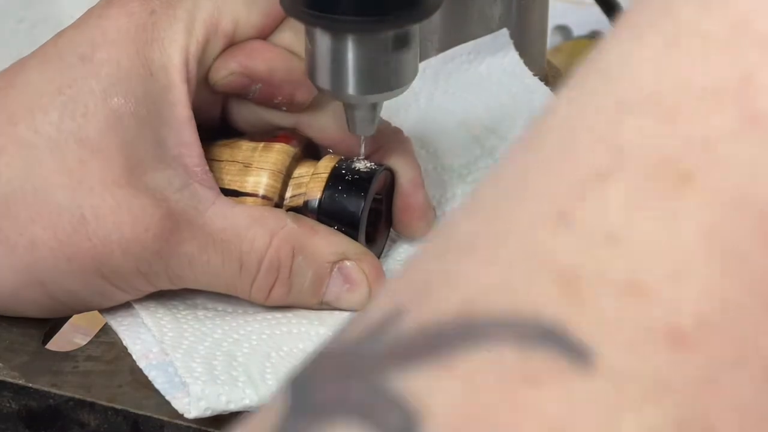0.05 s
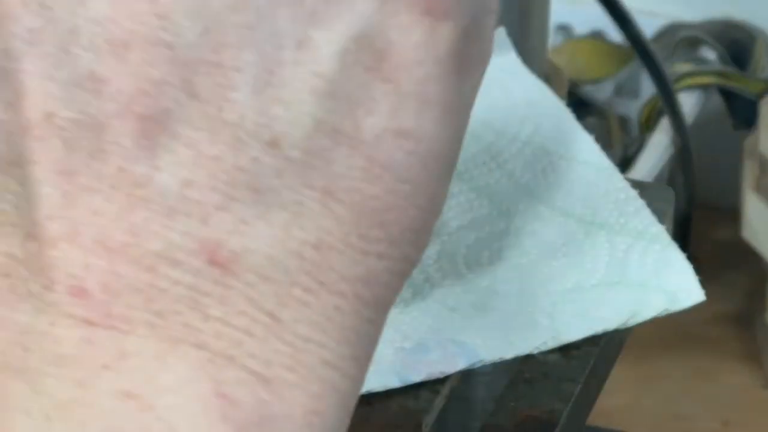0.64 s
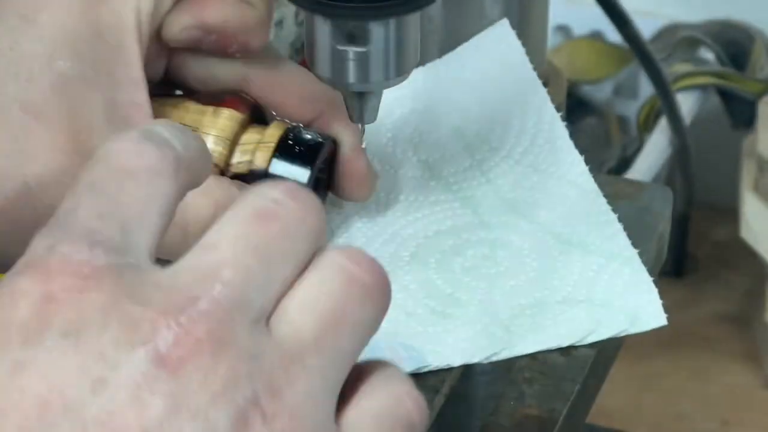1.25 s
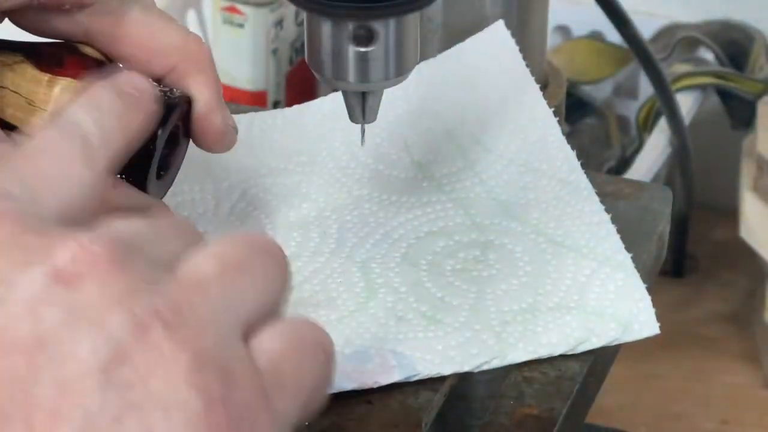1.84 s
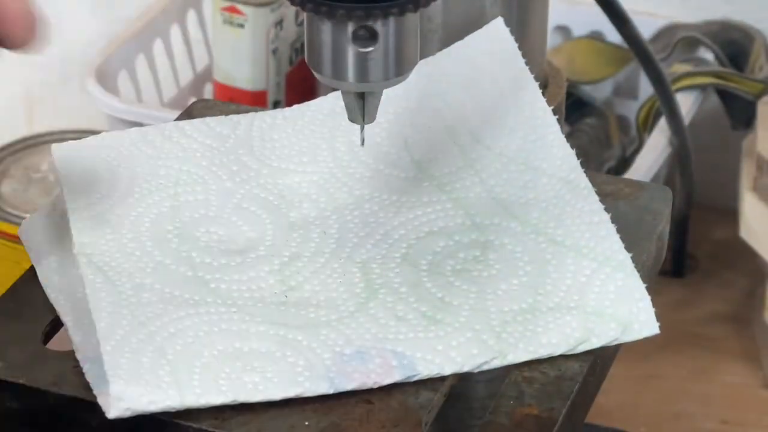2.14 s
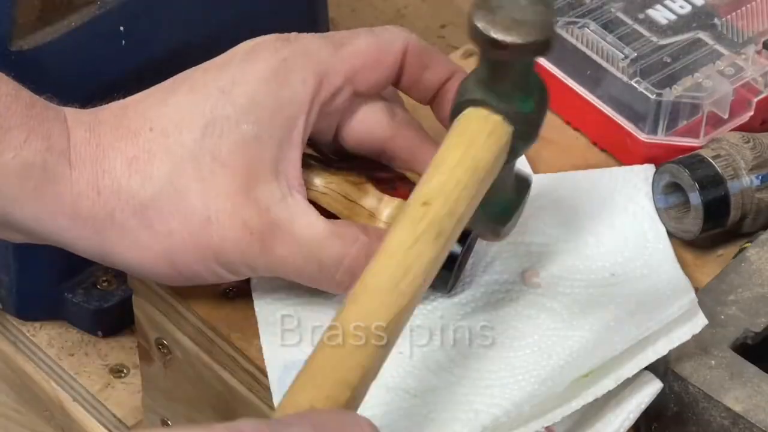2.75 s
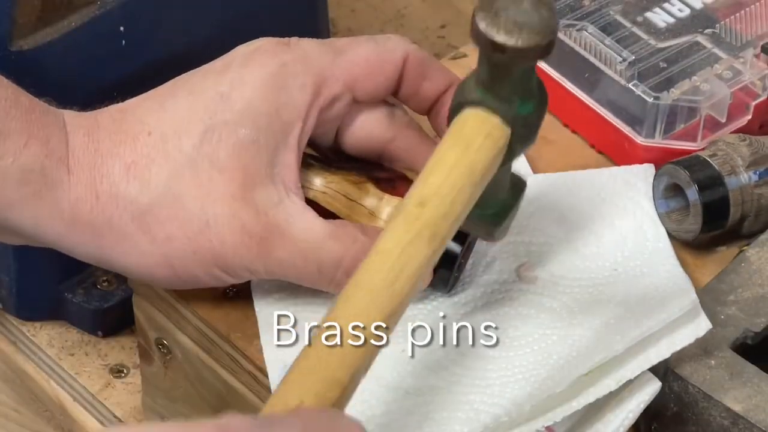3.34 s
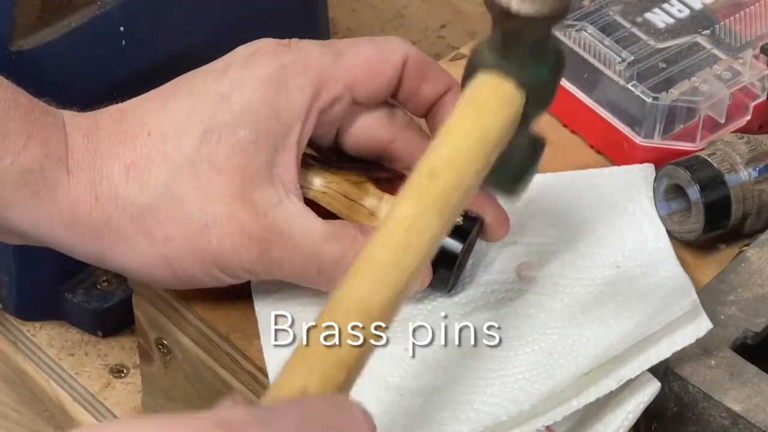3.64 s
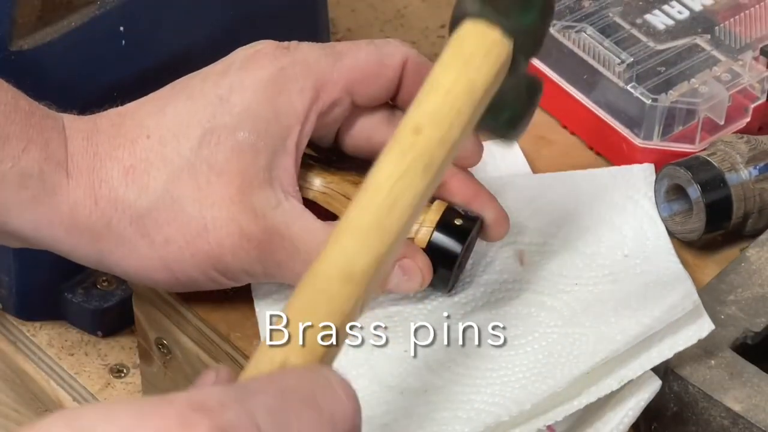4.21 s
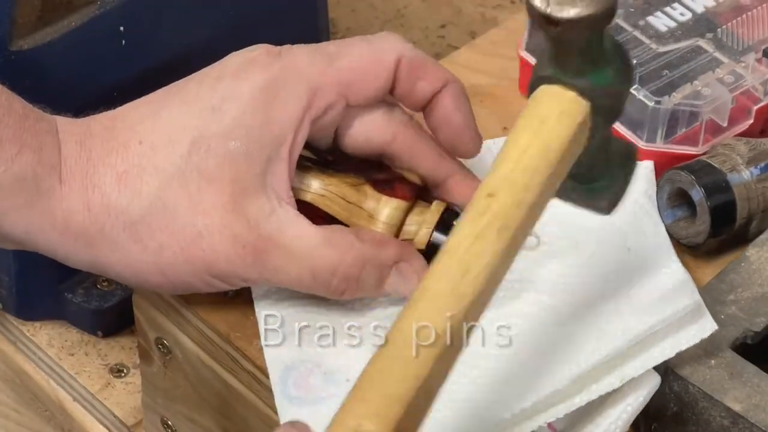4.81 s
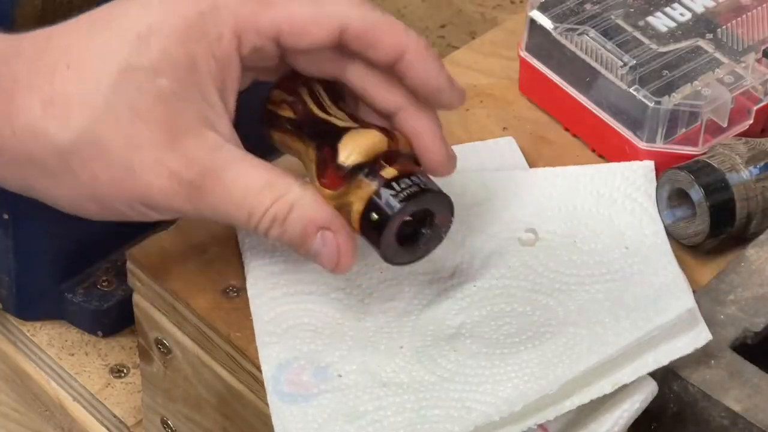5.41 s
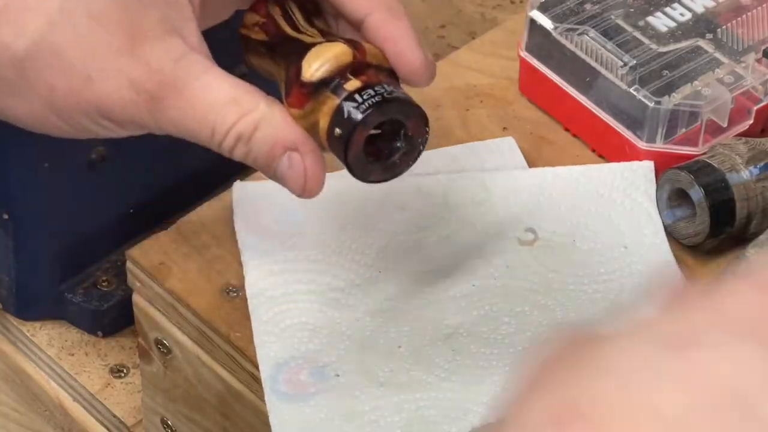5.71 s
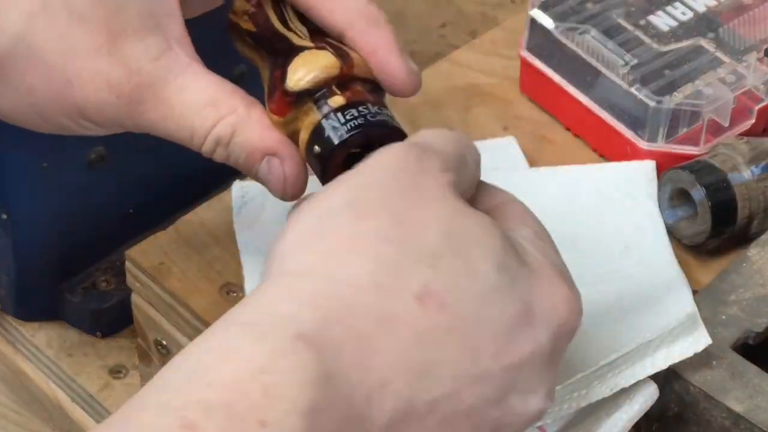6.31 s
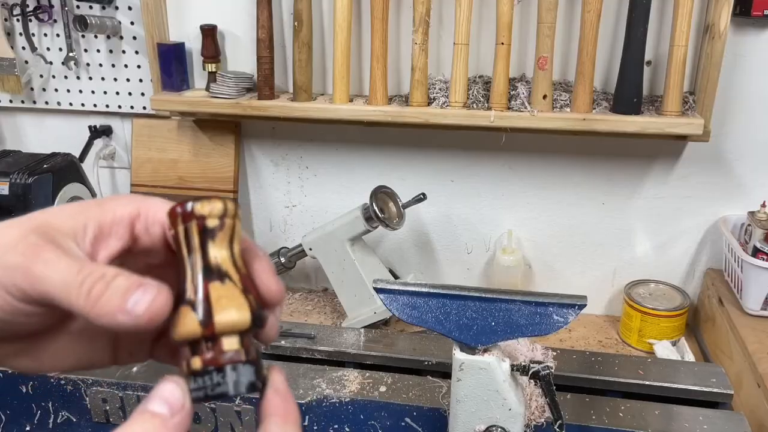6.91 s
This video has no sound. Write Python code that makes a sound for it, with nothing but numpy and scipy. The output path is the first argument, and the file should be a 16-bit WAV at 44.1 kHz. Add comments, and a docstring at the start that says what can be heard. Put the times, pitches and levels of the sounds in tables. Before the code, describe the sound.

A drill press hums close to the microphone in a small workshop, with belt noise and a low throb. At about 0.7 seconds its switch gives a bright scrape and snaps off at 0.8. The motor coasts down, sinking in pitch and shuddering, with a dull, soft bump near 1.4 seconds and faint brushing and ticks from fingers.

From about 2.4 to 4.6 seconds a hammer taps metal pins into a wooden handle, roughly nine even blows at nearly four a second. These are the loudest sounds: each is a sharp crack with a short metallic ping, a woody knock and a brief room echo. At 5.2 seconds the hammer is laid on the bench with a light clack, and at 5.4 the handle rocks with a quick double knock. Very faint finger swishes and quiet room tone remain, the background air rising slightly at 6.6 seconds.

```python
"""A small workshop, microphone close to the work. A drill press hums with motor tones and belt noise;
its switch rasps and snaps off, and the spindle coasts down, its tones sinking. At 2.4 s we cut to the
bench: a hammer drives brass pins into a wooden handle, ringing pin, wood and bench top, and the room
answers each blow. The hammer is laid down, then the handle knocks the bench. Quiet room tone and faint
brushing fingers follow, with a last cut to the air by the lathe."""
import sys
import numpy as np
from scipy import signal
from scipy.fft import rfft, irfft, next_fast_len
from scipy.io import wavfile
from scipy.ndimage import uniform_filter1d, minimum_filter1d, map_coordinates

SR = 44100
rng = np.random.default_rng(int(sys.argv[2]) if len(sys.argv) > 2 else 0)


def inscribe(sig):
    """Save sig as 16-bit PCM at rate SR to the path in sys.argv[1].

    A 1-D sig is mono; a 2-D sig holds one channel per row.
    Samples are clipped to [-1, 1] before scaling.
    """
    pcm = np.round(np.clip(np.atleast_2d(sig).T, -1, 1) * 32767)
    wavfile.write(sys.argv[1], SR, pcm.astype(np.int16))


N = 311328

BENCH_S, LATHE_S = 2.358, 6.64  # the microphone's place cuts to the bench, then to the lathe
OFF_S, COAST_S = .86, 1.5  # the motor loses power; time constant of the slowing spindle
# spectrum of a hard contact: (frequency [Hz], level [dB])
CRACK = [(50, -13.5), (300, -7), (1500, 16.5), (3000, 9), (5000, -8), (6800, -0.5), (7600, -1.5), (9000, 6),
         (12000, -17), (14000, -20), (16000, -31)]


def hammering(bench_lag_s=.0022, soft_db=-22, harden_db_per_blow=3, hard_above_hz=10500):
    """Steel cracks on the pin, the handle rings, and a moment later the bench takes the blow."""
    # hammer blows: (time [s], bench thump [dB], handle knock [dB], pin ping [dB], crack [dB])
    blows = [(2.161, -6, -4.5, -5.5, -21), (2.4531, -5.5, -2.5, -7, -11), (2.7318, -6, -2.5, -8.5, -9),
             (2.9972, -6, -1.5, -9.5, -9.5), (3.2671, -9, 0, -14, -10), (3.539, -6.5, 2, -16, -8.5),
             (3.809, -8.5, -1.5, -10, -7), (4.081, -3, 0, -15.5, -6), (4.3573, -4, -3.5, -5, -13.5),
             (4.638, -5, -4.5, -4, -11.5)]
    # modes of each struck part: (frequency [Hz], level [dB], t60 [s])
    pin_modes = [(2705, -2, 0.035), (2896, -2.5, 0.035), (3750, -5.5, .012), (6710, -10, 0.014),
                 (8785, -7.5, 0.013)]  # brass pin and hammer head
    face_modes = [(11800, -17, .007), (12900, -18.5, .007), (15500, -32, .005)]  # hammer face
    wood_modes = [(771, -3, 0.037), (960.6, -2.5, 0.045), (1180, -10, 0.03), (1299.4, -3, 0.02),
                  (1497, -7, 0.027), (1770, -4, 0.031), (2030, -6, 0.029), (2501, -12, 0.04)]  # wooden handle
    bench_modes = [(138.5, -5.5, 0.043), (161.5, -14.5, 0.32), (238.8, 0, 0.053), (280, -24, 0.93),
                   (389.5, 0, 0.061), (530, 3, 0.023), (632, 3, .038)]  # bench top
    out = np.zeros((2, N))
    for k, (s, thump_db, knock_db, ping_db, crack_db) in enumerate(blows):
        hard_db = soft_db + harden_db_per_blow * k  # the pin seats: each blow is harder at the top
        pin = amp(ping_db) * ring(pin_modes, rise_s=.00011, scatter_db=1.5, detune=.003)
        face = amp(hard_db) * ring(face_modes, rise_s=.0001, scatter_db=4, detune=.0071)
        wood = amp(knock_db) * ring(wood_modes, rise_s=.004, scatter_db=1, detune=.008)
        bench = amp(thump_db) * ring(bench_modes, rise_s=.0025, scatter_db=1.5, detune=.0023)
        bench = np.pad(bench, (round(bench_lag_s * SR), 0))[:len(pin)]
        spectrum = [(hz, db + (3 + hard_db) * (hz > hard_above_hz)) for hz, db in CRACK]
        crack = amp(crack_db) * burst(spectrum, t60=.037)
        add(out, s, in_room(pin + face + wood + bench + crack, wet_db=-10))
    return out


def hammer_laid_down():
    """The hammer meets the bench in two quick contacts and rings."""
    # contacts with the bench: (time [s], level [dB])
    contacts = [(5.1745, -14), (5.179, -21.5)]
    # modes of the whole hammer: (frequency [Hz], level [dB], t60 [s])
    modes = [(437, 0, 0.016), (720, -0.5, 0.0071), (940, -6.5, 0.045), (1524, -14, 0.029),
             (1765, -9.5, 0.045), (2790, -12.5, 0.08), (3650, -12.5, 0.038), (4360, -18.5, 0.047),
             (5520, -18, 0.038), (7040, -33, 0.16), (10300, -39.5, 0.94), (11720, -48.5, 0.42)]
    return knocks(contacts, modes, crack_db=-14.5, wet_db=-5.5, spread=.093, t60_scale=.93)


def handle_rocking():
    """The wooden handle rocks on the bench with a double knock."""
    # contacts with the bench: (time [s], level [dB])
    contacts = [(5.4015, -14), (5.4175, -15)]
    # modes of the handle: (frequency [Hz], level [dB], t60 [s])
    modes = [(313, -10, 0.024), (425, -8.5, 0.058), (600, -4.5, 0.028), (785, -4, 0.025),
             (890, -10.5, 0.047), (990, -2, 0.061), (1060, -0.5, 0.02), (1496, -15.5, 0.13),
             (1820, -21, 0.086), (2020, -18, 0.081), (2360, -12, 0.036), (3216, -11, 0.029),
             (3800, -22, 0.12), (4270, -18.5, 0.028), (5220, -32, 0.15)]
    return knocks(contacts, modes, crack_db=-17.5, wet_db=-4.5, spread=.046, t60_scale=.72)


def knocks(contacts, modes, crack_db, **room):
    """A thing set down on the bench: each contact cracks and rings its modes."""
    out = np.zeros((2, N))
    for s, db in contacts:
        body = ring(modes, rise_s=.00013, scatter_db=2, detune=.0023)
        crack = amp(crack_db) * burst(CRACK, t60=.076)
        add(out, s, in_room(amp(db) * (body + crack), **room))
    return out


def drill(shaft_hz=27.9, flutter_db=4, frame_hold_s=.2):
    """Motor tones sink with the speed; belt and bearing noise drop with the power, then fade slowly."""
    # motor and pulley tones at full speed: (frequency [Hz], level [dB])
    partials = [(167, -45.5), (303, -39.5), (381, -39.5), (404, -47), (619, -45.5), (719.7, -38),
                (739.8, -41.5), (769.6, -43.5), (785, -44.5), (860, -53.5), (889, -55.5), (1130, -56),
                (1394, -50.5), (1729, -52.5), (1846, -58)]
    # noise spectra of the running parts: (frequency [Hz], level [dB])
    belt_spectrum = [(40, -39), (70, -12.5), (90, -16), (150, -8), (200, -3.5), (300, -3.5), (440, -5),
                     (560, -12), (760, -8.5), (1030, -19.5), (1400, -18), (1550, -26.5), (1850, -27.5),
                     (2200, -38.5), (4000, -44), (6000, -79.5)]
    bearing_spectrum = [(1180, -26), (2000, 0), (4210, -8), (4620, -10), (8930, -5), (10300, -4),
                        (11300, -17), (13000, -41)]
    frame_spectrum = [(70, -36), (95, -8.5), (110, 5.5), (128, -14), (150, 1.5), (170, 5), (200, -12),
                      (300, -50)]
    turn = phase_of(spindle_speed() * (1 + .0012 * wobble(12)))
    tones = sum(amp(db + flutter_db * wobble(7.7)) * np.sin(hz * turn + rng.uniform(0, 2 * np.pi))
                for hz, db in partials)
    slap = 1 + .1 * np.sin(shaft_hz * turn)  # the belt slaps once a turn
    # a loud driven part that dies fast, plus a quiet coasting part that lingers
    belt_level = np.hypot(fade(-29, db_per_s=78), fade(-41.5, db_per_s=19))
    hiss_level = np.hypot(fade(-48, db_per_s=58), fade(-63, db_per_s=12))
    belt = belt_level * amp(1.5 * wobble(16)) * diffuse(belt_spectrum)
    hiss = hiss_level * amp(1.5 * wobble(80)) * diffuse(bearing_spectrum)
    frame = fade(-43.5, db_per_s=35.5, from_s=OFF_S + frame_hold_s) * diffuse(frame_spectrum)
    return fade(1, db_per_s=116) * tones + slap * (belt + hiss) + frame


def spindle_speed():
    """Share of full speed: steady under power, then coasting down."""
    return np.exp(-since(OFF_S) / COAST_S)


def mains_hum():
    """The motor's magnetic hum keeps its pitch and dies with the power."""
    # hum tones: (frequency [Hz], level [dB])
    partials = [(119.6, -37), (240, -28.5)]
    hum = sum(amp(db) * np.sin(2 * np.pi * hz * clock()) for hz, db in partials)
    return fade(1.3 * wobble(8), db_per_s=106) * hum


def frame_shake():
    """Low orders of the coasting spindle glide down and swell in the frame."""
    # spindle orders: (frequency at full speed [Hz], level [dB], swell time [s], length [s])
    orders = [(128, -36.5, 0.89, .13), (215, -36.5, 1.2, 0.077), (225, -42, 1.336, 0.064)]
    turn = phase_of(spindle_speed())
    return sum(swells([(s, length, db)]) * np.sin(hz * turn) for hz, db, s, length in orders)


def column_boom(pitch_hz=63, sag_hz_per_s=2.8, throb_hz=5.15, throb_peak_s=.345, release_s=.07):
    """The drill column's lowest resonance throbs under power, then shudders and swells as it coasts."""
    # swells as the slowing shaft's orders pass the resonance: (time [s], length [s], level [dB])
    passes = [(1.02, 0.18, -36.5), (1.18, 0.12, -35), (1.455, .125, -33.5), (1.82, 0.092, -51),
              (2.03, 0.11, -63)]
    powered = np.exp(-since(OFF_S) / release_s)
    throb = amp(-37.5 + 7 * np.cos(2 * np.pi * throb_hz * (clock() - throb_peak_s)))
    shudder = fade(-41 + 3 * wobble(12), db_per_s=21)
    level = powered * throb + (1 - powered) * shudder + swells(passes)
    return level * np.sin(phase_of(pitch_hz - sag_hz_per_s * since(OFF_S)))


def bearing_whine(full_db=-66, fade_db=14):
    """The spindle bearing sings thinly at a steady pitch, fading as the spindle slows."""
    # spectrum of the whine: (frequency [Hz], level [dB])
    spectrum = [(2200, -32), (2550, -10.5), (2830, 3.5), (3150, -17.5), (3480, -6), (3800, -32.5)]
    return amp(full_db - fade_db * (1 - spindle_speed())) * diffuse(spectrum)


def switch_rasp(start_s=.661, attack_s=.07, end_s=.82, grain_db=1.36, drift=.0065):
    """The pushed switch gives a bright scrape with thin squeaks in it, then dies away."""
    # scrape spectrum and squeak tones: (frequency [Hz], level [dB])
    scrape_spectrum = [(700, -38), (1200, -14.5), (2400, -3), (2750, -3), (3050, -1), (3500, -9.5),
                       (4000, -6.5), (4500, -10.5), (6500, -4.5), (8600, 1.5), (12600, -11.5), (13900, -36),
                       (15500, -34), (16500, -68.5)]
    squeaks = [(3100, -15), (4060, -15)]
    push = np.minimum(since(start_s) / attack_s, 1) * fade(-28.5, db_per_s=88, from_s=end_s)
    squeak = sum(amp(db) * np.sin(phase_of(hz * (1 + drift * wobble(200)))) for hz, db in squeaks)
    return push * amp(grain_db * wobble(90)) * (diffuse(scrape_spectrum) + squeak)


def switch_snap(time_s=.8115, level_db=-6.5):
    """The switch snaps off and its lever rings into the room."""
    # spectrum of the snap: (frequency [Hz], level [dB])
    spectrum = [(400, -22.5), (900, -6), (1410, -19), (1960, -5), (2970, -14), (4170, -7.5), (4830, -18.5),
                (6620, -6), (11000, -12.5), (16500, -26.5)]
    # modes of the lever: (frequency [Hz], level [dB], t60 [s])
    lever_modes = [(920, -7, .035), (1650, 2.5, 0.04), (1920, 2, 0.05), (2300, -6, .06),
                   (4120, -3.5, 0.032)]
    snap = burst(spectrum, t60=.024)
    lever = amp(-11) * ring(lever_modes, rise_s=.00023, scatter_db=1, detune=.0035)
    out = np.zeros((2, N))
    add(out, time_s, in_room(amp(level_db) * (snap + lever), wet_db=-15.5))
    return out


def handle_bump(time_s=1.378, attack_s=.012):
    """A dull, padded knock as the handle is lifted from the drill table."""
    # spectrum of the knock: (frequency [Hz], level [dB])
    spectrum = [(60, -20), (130, 3), (400, -1.5), (700, -13.5), (1200, -29.5), (3000, -49.5)]
    rise = np.minimum(since(time_s) / attack_s, 1)
    return rise * fade(-35, db_per_s=155, from_s=time_s) * diffuse(spectrum)


def fingers(grain_db=2):
    """Skin brushes paper and wood in short grainy swishes, and ticks on the handle."""
    # swishes: (time [s], length [s], level [dB])
    brushes = [(0.524, 0.04, -40), (1.462, 0.1, -59), (1.667, 0.072, -56.5), (1.86, 0.036, -55.5),
               (2.15, 0.12, -59), (2.29, 0.11, -61.5), (4.96, 0.15, -67), (5.15, 0.063, -65.5),
               (6.1, 0.099, -75.5), (6.23, 0.04, -73), (6.74, .14, -70.5), (6.87, .03, -70)]
    # ticks: (time [s], level [dB])
    ticks = [(2.157, -44), (2.201, -47), (2.27, -47.5)]
    # spectrum of skin on paper and wood: (frequency [Hz], level [dB])
    spectrum = [(500, -17), (2000, -9), (3500, -9.5), (6000, -8), (9000, 3), (11500, -5.5), (13000, -40),
                (16000, -49.5)]
    out = swells(brushes) * amp(grain_db * wobble(200)) * diffuse(spectrum)
    for s, db in ticks:
        add(out, s, amp(db) * burst(spectrum, t60=.019))
    return out


def in_room(sound, wet_db, spread=.25, t60_scale=.98, build_s=.0078, early_s=.025):
    """The close sound plus the workshop's diffuse answer, which keeps the sound's broad colour."""
    # spectrum of the reverberation: (frequency [Hz], level [dB])
    room_spectrum = [(50, 4.5), (130, -1), (250, 1), (600, -3.5), (1500, -0.5), (2200, -2.5), (3000, -9),
                     (5000, -4.5), (9000, -8.5), (12000, -10), (14000, -20.5)]
    # room decay before t60_scale: (frequency [Hz], t60 [s])
    room_decay = [(100, 0.89), (250, 0.79), (600, 0.81), (1500, 0.61), (2800, 0.62), (4500, 0.48),
                  (9000, 0.43), (14000, 0.3)]
    hz, t, bands = signal.stft(diffuse(room_spectrum, SR), SR, nperseg=256)
    t60 = t60_scale * along(room_decay, hz)[:, None]
    tail = signal.istft(bands * amp(-60 * t / t60), SR, nperseg=256)[1][:, :SR]
    age = np.arange(SR) / SR
    tail *= 1 + np.exp(-age / early_s)  # near walls answer first and louder
    tail = filtered(tail / np.linalg.norm(tail[0]), broad_colour(sound.mean(0), spread))
    out = amp(wet_db) * tail * np.minimum(age / build_s, 1)
    add(out, 0, sound)
    return out


def room_tone(hum_hz=88.5, bench_fade_s=6.4):
    """Faint air at each microphone position; at the bench a distant machine hums."""
    # air at drill and bench, and air by the lathe: (frequency [Hz], level [dB])
    shop_air = [(30, -18), (60, -2), (100, -4.5), (150, -9.5), (300, -10.5), (600, -26), (1500, -35),
                (4000, -40), (9000, -32), (13000, -48.5)]
    lathe_air = [(18, -42), (30, -12), (89, -1), (124, 2), (165, -10), (319, -2), (601, -16), (1700, -22.5),
                 (2030, -17), (3650, -33), (4300, -21), (5200, -32), (8880, -19), (10900, -22),
                 (13000, -53.5)]
    at_drill = fade(-61.5, db_per_s=1, from_s=0) * diffuse(shop_air)
    at_lathe = fade(-61.5, db_per_s=15.6, from_s=LATHE_S) * diffuse(lathe_air)
    at_bench = fade(-72.5, db_per_s=47, from_s=bench_fade_s) * diffuse(shop_air)
    hum = np.sqrt(2) * np.sin(2 * np.pi * hum_hz * clock())
    at_bench += fade(-71, db_per_s=35, from_s=bench_fade_s) * hum
    return np.select([clock() < BENCH_S, clock() < LATHE_S], [at_drill, at_bench], at_lathe)


def ring(modes, rise_s, scatter_db, detune):
    """Damped modes, struck a little differently each time; little sounds below the lowest mode."""
    t = np.arange(SR // 2) / SR
    hz, db, t60 = np.transpose(modes)[:, :, None]
    level, pitch = rng.standard_normal((2, len(modes), 1))
    sign = (-1) ** np.arange(len(modes))[:, None]
    decay = amp(db + scatter_db * level - 60 * t / t60)
    waves = sign * decay * np.sin(2 * np.pi * hz * (1 + detune * pitch) * t)
    low_cut = signal.butter(2, hz.min() / 3, "high", fs=SR, output="sos")
    return signal.sosfilt(low_cut, waves.sum(0) * (1 - np.exp(-t / rise_s)))


def burst(spectrum, t60):
    """The short crack of a hard contact: random in its fine shape, steady in its colour."""
    size = SR // 2
    hz = np.fft.rfftfreq(size, 1 / SR)
    decay = amp(-60 * np.arange(size) / SR / t60)
    phase = np.angle(rfft(rng.standard_normal(size) * decay))
    crack = irfft(amp(along(spectrum, hz)) * np.exp(1j * phase), size) * np.sqrt(decay)
    return np.tile(crack * np.linalg.norm(decay) / np.linalg.norm(crack), (2, 1))


def diffuse(spectrum, size=N):
    """Coloured stereo noise of rms 1, nearly mono in the bass."""
    # stereo width at the microphone: (frequency [Hz], side over mid [dB])
    width = [(40, -20), (150, -15), (300, -9.5), (1000, -1.5), (2000, -10), (5000, -10), (8000, -21),
             (13000, -15)]
    mid, side = rng.standard_normal((2, size))
    mid = filtered(mid, lambda hz: amp(along(spectrum, hz)))
    side = filtered(side, lambda hz: amp(along(spectrum, hz) + along(width, hz)))
    noise = np.array([mid + side, mid - side])
    return noise / np.sqrt(np.mean(noise ** 2) + 1e-20)


def broad_colour(sound, spread):
    """The gain of a sound at each frequency, averaged over a band of relative width spread."""
    grid = np.fft.rfftfreq(len(sound), 1 / SR)
    energy = np.cumsum(np.abs(rfft(sound)) ** 2) * grid[1]
    half = grid * spread / 2 + grid[1]
    power = (np.interp(grid + half, grid, energy) - np.interp(grid - half, grid, energy)) / (2 * half)
    return lambda hz: np.interp(hz, grid, np.sqrt(np.abs(power)))


def amp(db):
    """Decibels to gain."""
    return 10 ** (np.asarray(db) / 20)


def clock():
    """The time of each sample."""
    return np.arange(N) / SR


def since(s):
    """Seconds gone by after time s; zero before it."""
    return np.maximum(clock() - s, 0)


def fade(db, db_per_s, from_s=OFF_S):
    """A gain that holds, then falls; by default from the moment the motor loses power."""
    return amp(db - db_per_s * since(from_s))


def swells(rows):
    """Bell-shaped envelopes from (time [s], length [s], level [dB]) rows."""
    return sum(amp(db) * np.exp(-(2 * (clock() - s) / length) ** 2) for s, length, db in rows)


def wobble(rate):
    """A smooth random curve, rate knots a second."""
    return map_coordinates(rng.standard_normal(int(N * rate / SR) + 4), [clock() * rate])


def phase_of(hz):
    """The running phase of a changing frequency."""
    return 2 * np.pi * np.cumsum(hz) / SR


def along(points, hz):
    """(frequency [Hz], value) points read on a log axis."""
    knots, values = np.transpose(points)
    return np.interp(np.log(hz + 1), np.log(knots + 1), values)


def filtered(x, response):
    """x shaped by a frequency response."""
    size = x.shape[-1]
    padded = next_fast_len(size + 8192)
    return irfft(rfft(x, padded) * response(np.fft.rfftfreq(padded, 1 / SR)), padded)[..., :size]


def add(track, s, sound):
    """Mix a sound in at time s."""
    part = track[:, round(s * SR):][:, :sound.shape[-1]]
    part += sound[..., :part.shape[-1]]


def scene(cut_s=.00405):
    """Close on the drill press, then a cut to the bench in the tail of the first blow."""
    press = drill() + mains_hum() + frame_shake() + column_boom() + bearing_whine()
    press += switch_rasp() + switch_snap() + handle_bump()
    bench = hammering() + hammer_laid_down() + handle_rocking()
    at_bench = np.minimum(since(BENCH_S) / cut_s, 1)
    return (1 - at_bench) * press + at_bench * bench + fingers() + room_tone()


def record(dry, ceiling=.85, top_hz=16600):
    """The microphone's two ports with their notches and phase, a fast limiter and the band limit."""
    # response of the ports: (frequency [Hz], level [dB])
    port = [(20, 1), (9500, -1), (10250, -16.5), (10900, 3), (12600, -8), (13300, -9.5), (14100, -20.5),
            (15200, -3.5), (16600, -7.5)]
    # phase between the ports: (frequency [Hz], phase [rad])
    lead = [(5800, 0), (7800, -1.1), (9500, -1.55), (13000, -1.2)]
    sides = np.array([[1], [-1]])
    heard = filtered(dry, lambda hz: amp(along(port, hz)) * np.exp(.5j * along(lead, hz) * sides))
    needed_gain = np.minimum(1, ceiling / (np.abs(heard).max(0) + 1e-9))
    gain = uniform_filter1d(minimum_filter1d(needed_gain, size=89), size=89)  # 2 ms windows
    return filtered(heard * gain, lambda hz: hz < top_hz)


dry = scene()
out = record(dry)
inscribe(out)
```